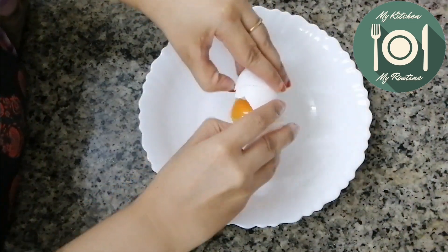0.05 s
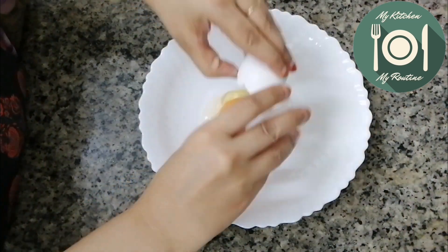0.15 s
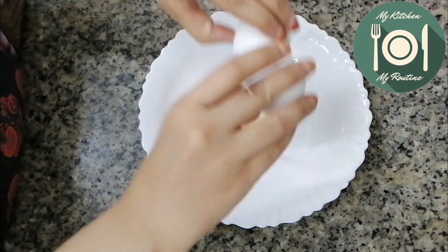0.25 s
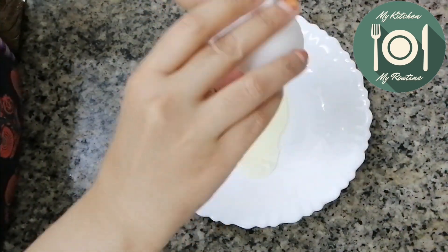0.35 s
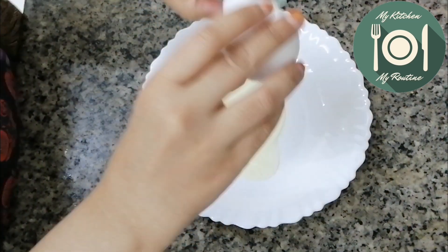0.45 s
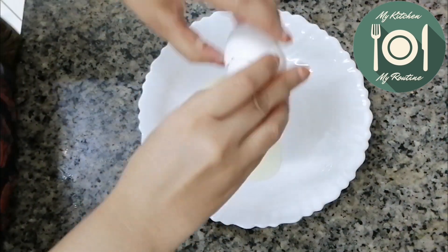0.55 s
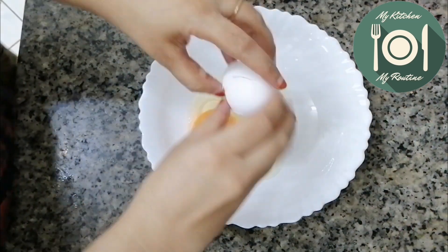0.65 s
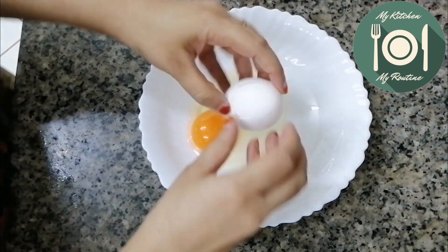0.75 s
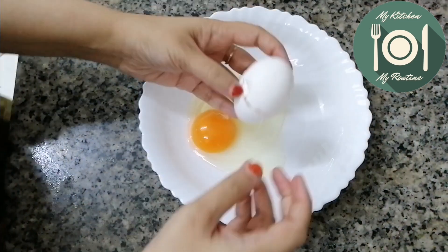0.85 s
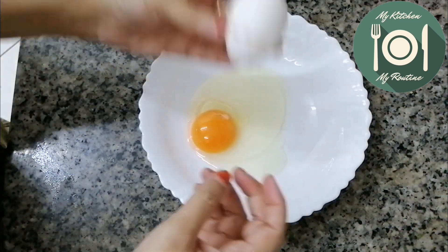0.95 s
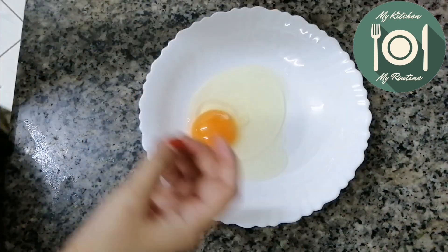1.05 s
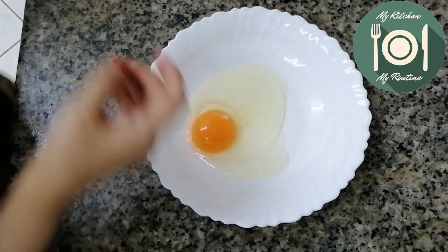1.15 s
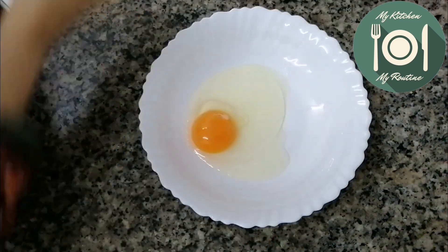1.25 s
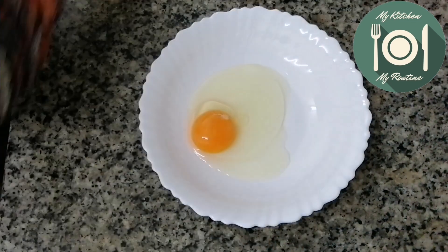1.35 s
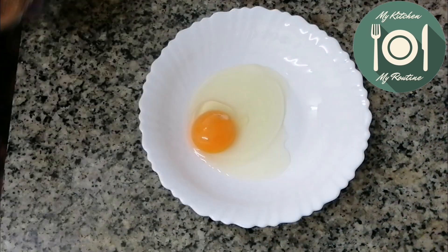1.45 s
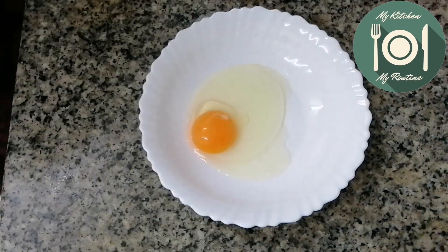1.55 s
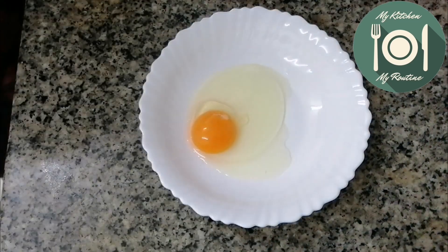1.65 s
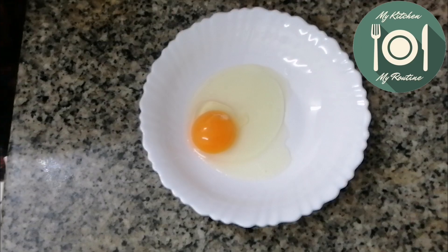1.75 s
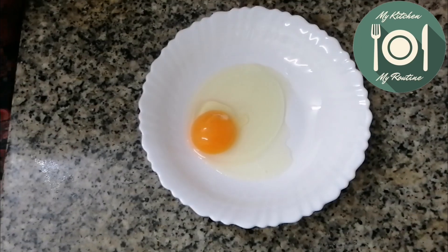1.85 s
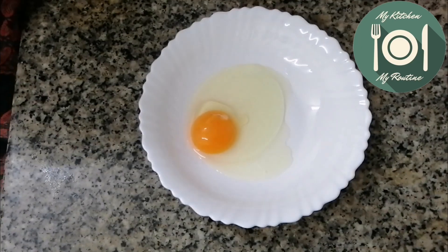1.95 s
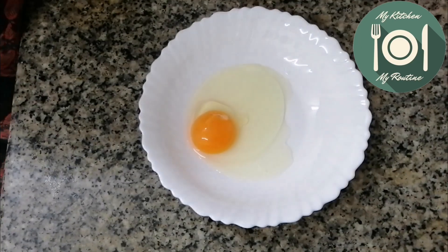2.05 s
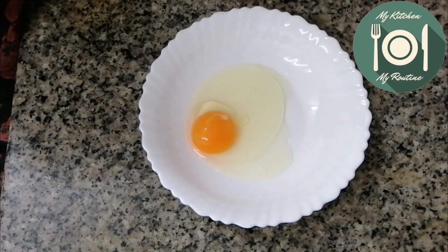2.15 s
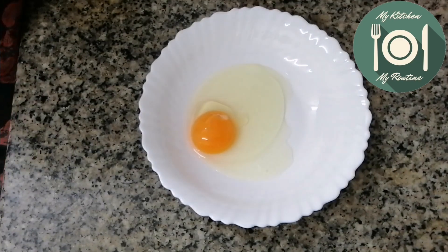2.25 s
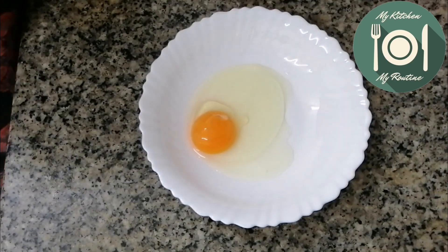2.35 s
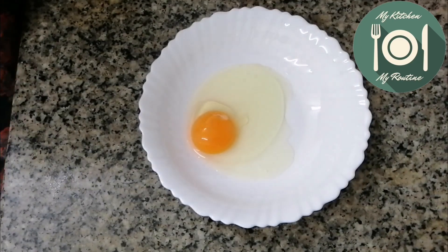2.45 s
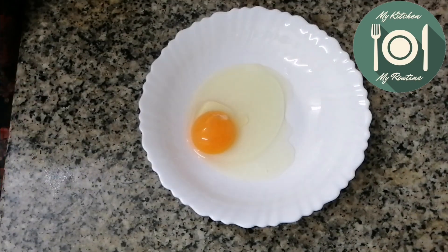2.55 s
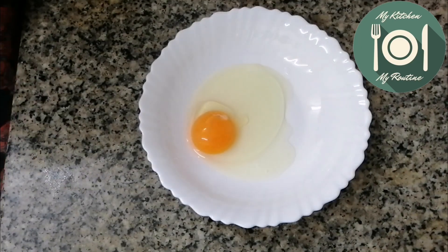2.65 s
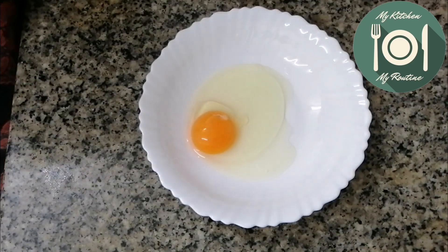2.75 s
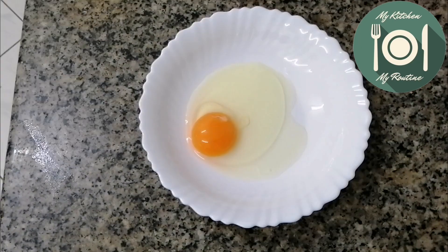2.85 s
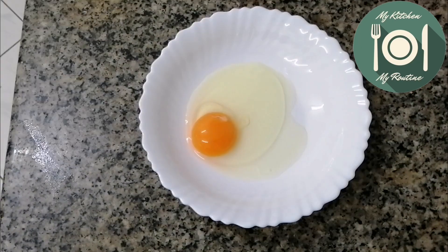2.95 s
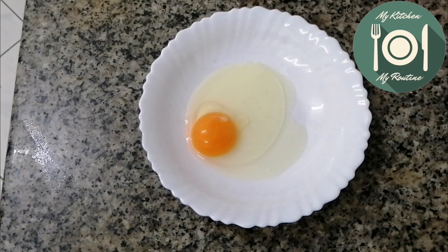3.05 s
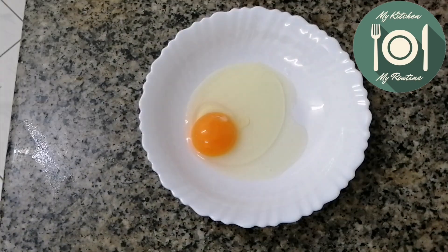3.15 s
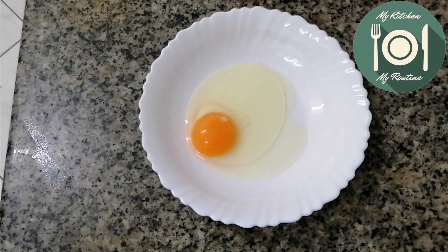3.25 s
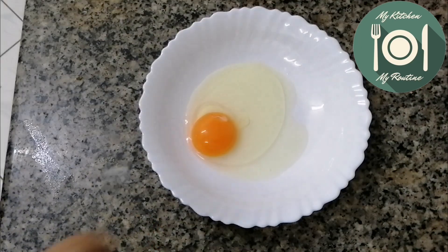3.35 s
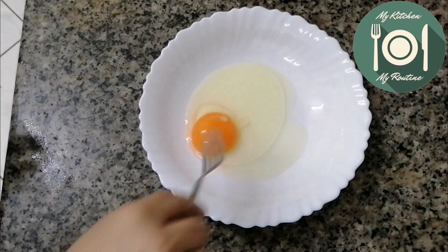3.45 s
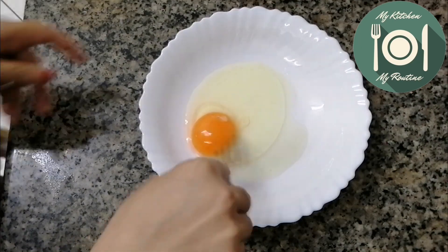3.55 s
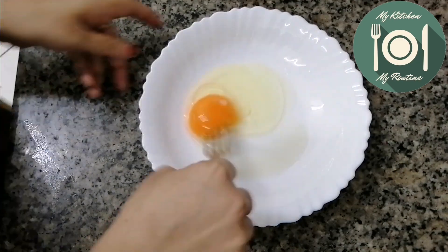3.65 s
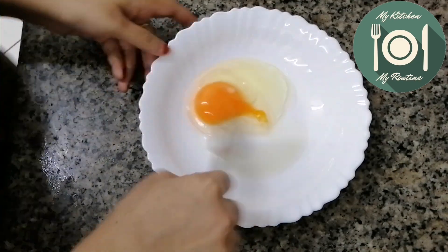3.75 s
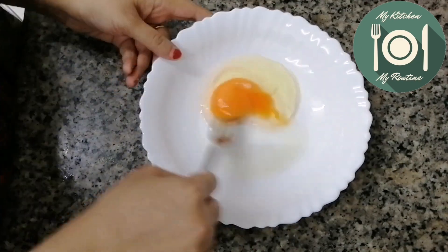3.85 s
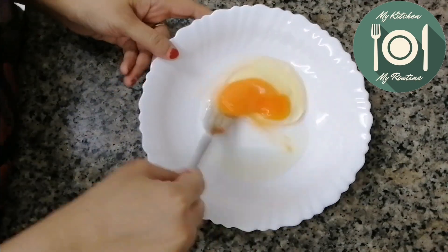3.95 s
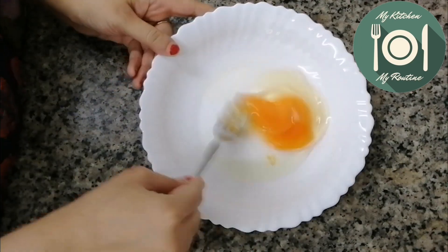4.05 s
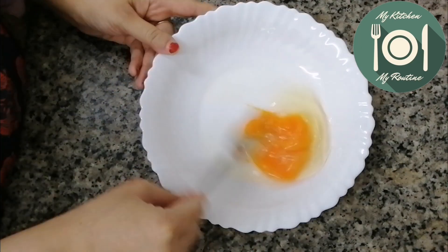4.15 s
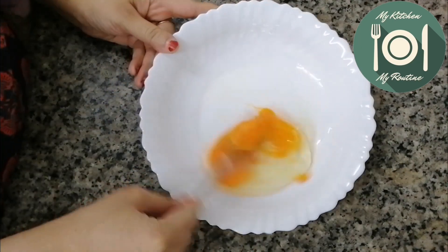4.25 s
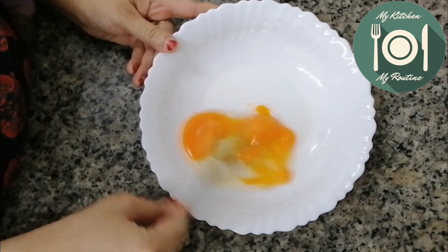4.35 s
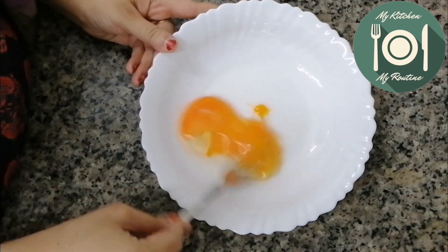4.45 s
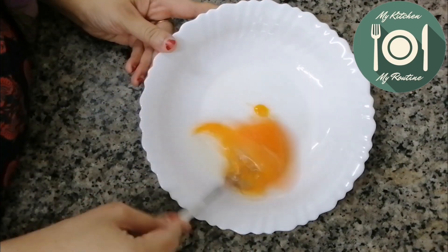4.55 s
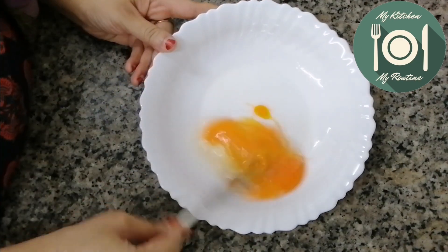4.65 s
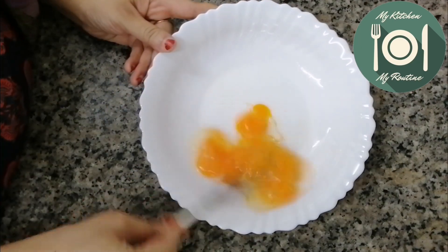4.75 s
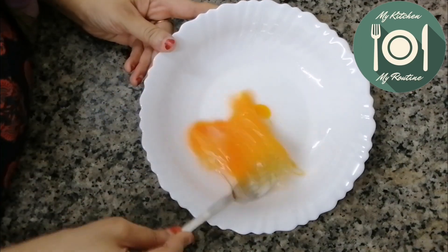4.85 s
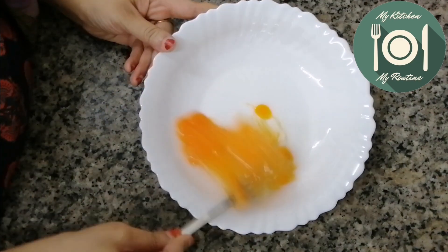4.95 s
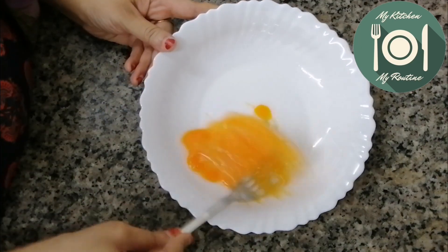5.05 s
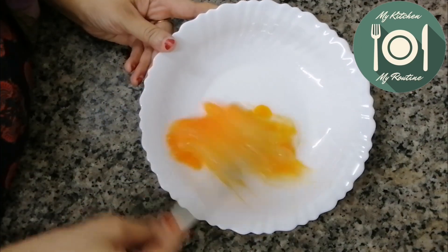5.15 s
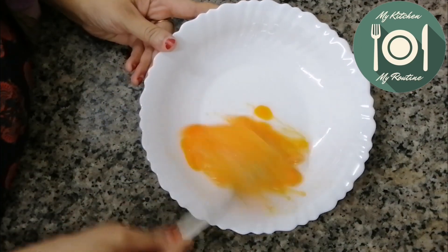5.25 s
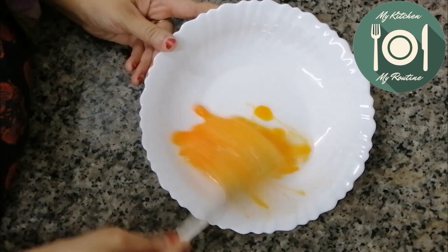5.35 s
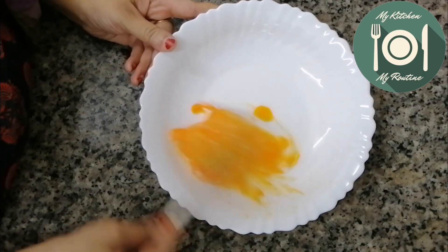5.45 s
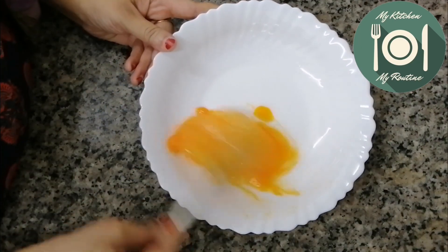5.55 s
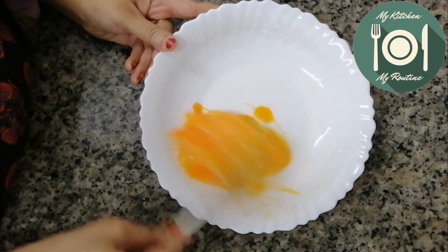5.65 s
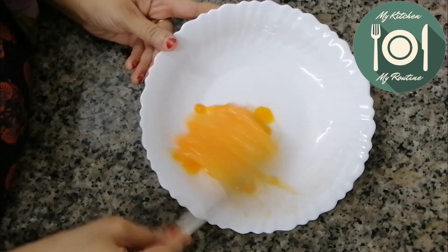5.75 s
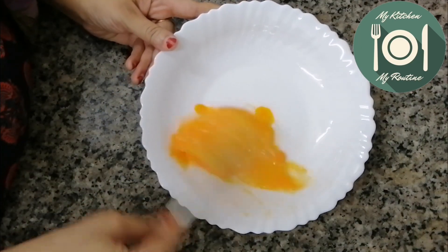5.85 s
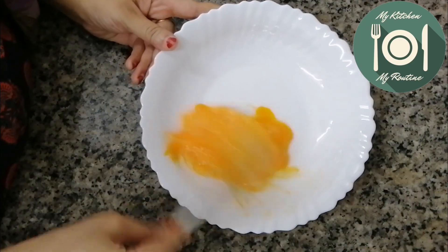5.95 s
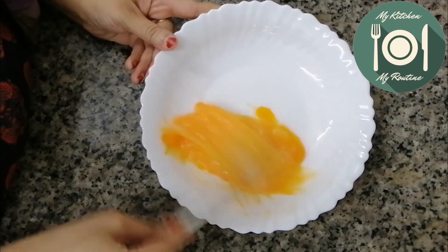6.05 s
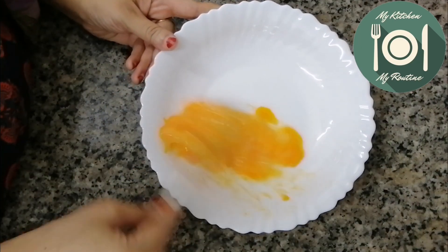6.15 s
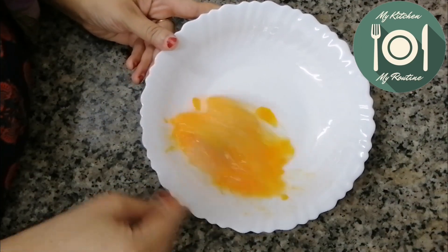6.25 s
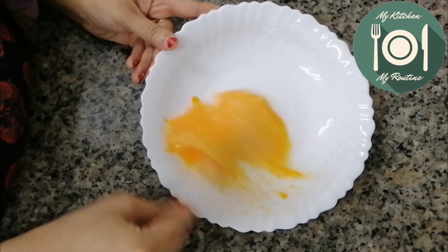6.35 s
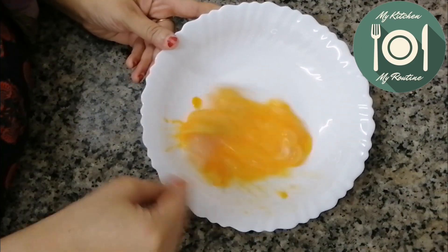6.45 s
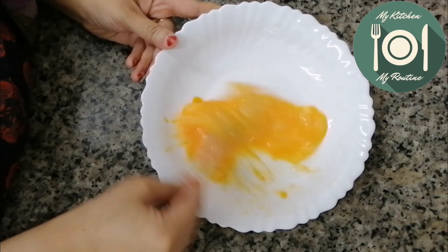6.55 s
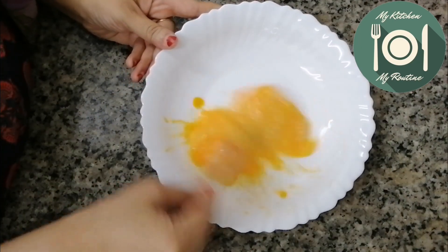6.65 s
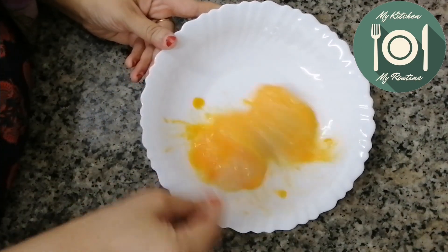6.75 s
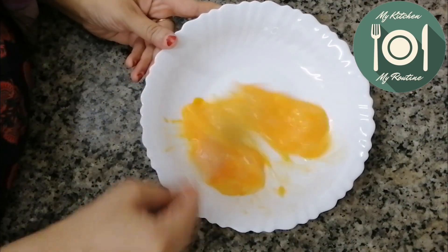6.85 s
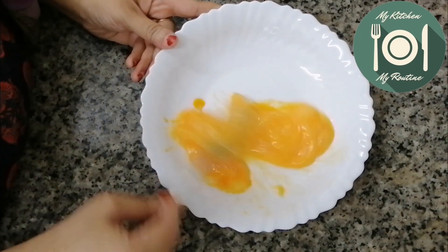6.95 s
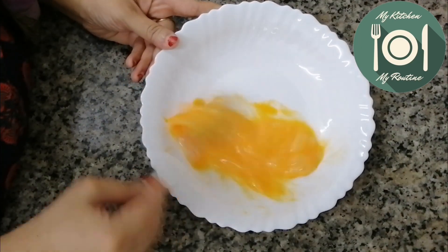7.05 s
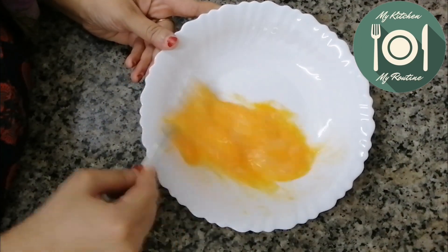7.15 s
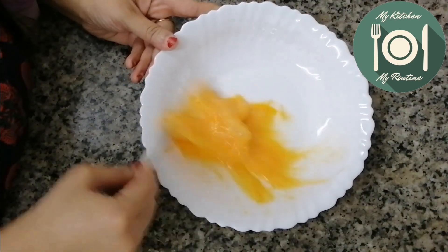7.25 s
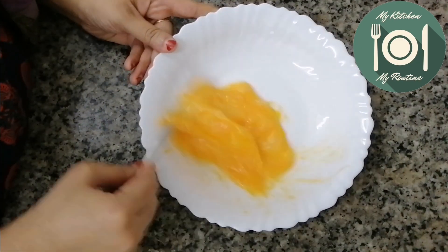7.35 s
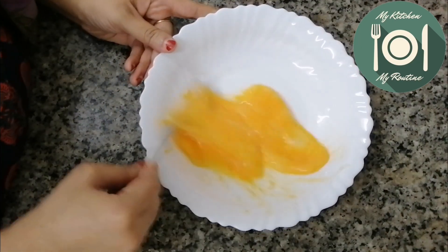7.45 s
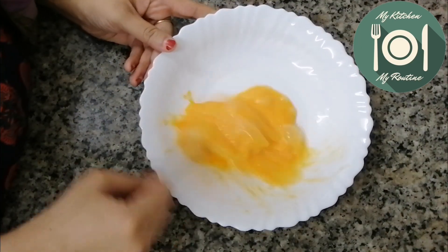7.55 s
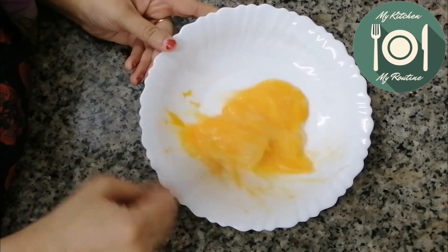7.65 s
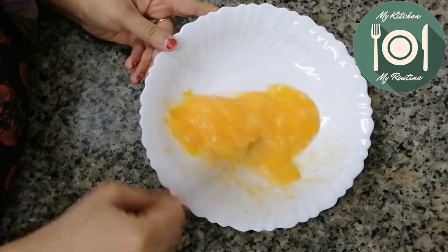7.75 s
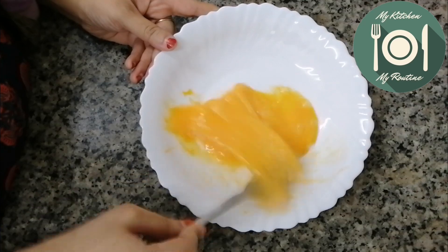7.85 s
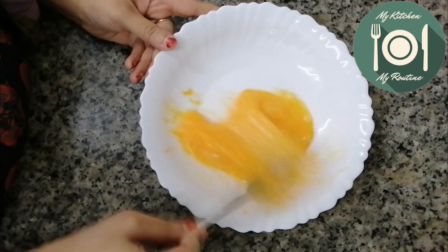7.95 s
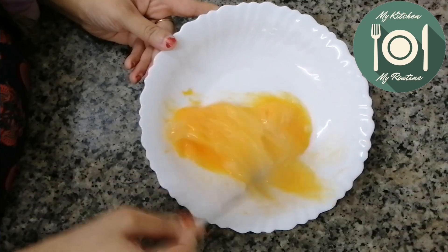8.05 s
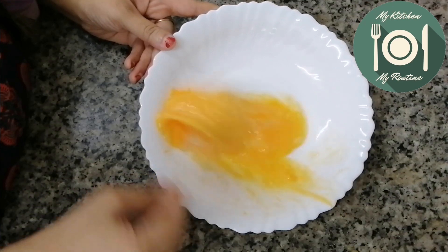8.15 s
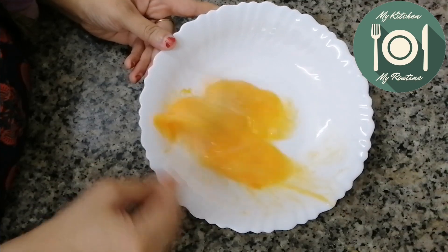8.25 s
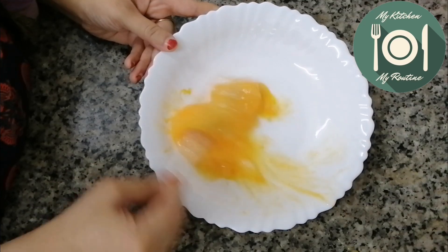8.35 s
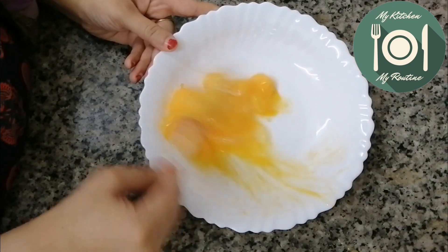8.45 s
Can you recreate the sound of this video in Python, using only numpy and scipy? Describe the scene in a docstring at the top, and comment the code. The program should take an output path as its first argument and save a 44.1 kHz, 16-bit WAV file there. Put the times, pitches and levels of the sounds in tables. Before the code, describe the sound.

Close in a small kitchen, over faint hum and hiss, crisp things snap quietly, then a plastic bag crinkles in short squeezes. Sound vanishes for an instant, and the counter takes a dull low thud with scuffs. A metal fork then beats egg on a ceramic plate about ten strokes a second, bright and clinking at first, soon wetter, with little slaps and splashes, until the end.

```python
"""A kitchen, close to a small microphone, over a low hum and hiss.
Crisp things crack as short noise puffs with a hollow note, then a plastic bag rustles as clumped noise.
The sound drops out for a moment; the counter is bumped, with a shudder of low noise, a thud and scuffs.
Then a fork beats egg on a ceramic plate ten times a second: each stroke is one or two noisy chatters
of tines that ring the resonances of the plate, with a wet slap and splash."""
import sys
import numpy as np
from scipy.fft import rfft, irfft, next_fast_len
from scipy.io import wavfile
from scipy.ndimage import uniform_filter1d, map_coordinates

SR = 44100
rng = np.random.default_rng(int(sys.argv[2]) if len(sys.argv) > 2 else 0)


def put_to_file(sound):
    """Save the sound as 16-bit audio at rate SR, in the file named by the first command-line argument."""
    columns = np.atleast_2d(sound).T  # one column per channel
    safe = np.clip(columns, -1, 1)
    whole_steps = np.round(safe * 32767)
    wavfile.write(sys.argv[1], SR, whole_steps.astype(np.int16))


N = 375291
SIZE = 8192  # samples in one burst with its echo

# Relative spectrum of crisp film, which also colours cracks and scuffs: (frequency [Hz], density [dB])
FILM_SPECTRUM = [(710, -43), (1460, -4), (1820, -1.5), (2990, 5.5), (3820, -0.5), (6540, 10.5),
                 (10700, -4.5), (15600, -6)]


def fork():
    """Tines chatter on the plate; where they land favours some modes; egg detunes, damps and splashes."""
    # touches of the fork, often two to a stroke: (time [s], level [dB], low modes re level [dB])
    strokes = [(4.127, -27.5, -7), (4.2088, -23, -8.5), (4.312, -20, -14), (4.41, -23.5, -10),
               (4.5051, -26.5, -0.5), (4.578, -54.5, 26.5), (4.6197, -24.5, -4), (4.717, -22, -11),
               (4.822, -21, -18.5), (4.9255, -23.5, -14), (5.0254, -22, -11.5), (5.131, -27, -6.5),
               (5.24, -28.5, -4), (5.344, -28.5, 2.5), (5.378, -32, -12), (5.445, -28.5, 0.5),
               (5.474, -34.5, -12), (5.5496, -26.5, -6), (5.578, -33, -29), (5.6572, -30, -12),
               (5.682, -34, -11), (5.7618, -32.5, -8), (5.784, -32, -13), (5.86, -28, -14),
               (5.884, -37.5, -8), (5.9605, -26, -4.5), (6.0586, -25, -12), (6.088, -33, -10),
               (6.1608, -24.5, -7), (6.189, -36, -5), (6.2636, -25, -8), (6.288, -36, -3.5),
               (6.3626, -26.5, -9.5), (6.3919, -32.5, -8.5), (6.465, -28, -9), (6.488, -35.5, -4),
               (6.5616, -26.5, -9), (6.5848, -28, -15), (6.67, -38.5, 3), (6.694, -34.5, -6),
               (6.7705, -29.5, -10.5), (6.7988, -29.5, -29), (6.872, -29, -10), (6.9013, -28, -13),
               (6.969, -27, -10), (7.074, -27, -14.5), (7.164, -34, 3), (7.266, -32.5, -3),
               (7.3715, -38.5, 1.5), (7.4681, -33.5, -6), (7.5011, -30.5, -28), (7.5798, -27.5, -11.5),
               (7.6083, -25.5, -15), (7.6912, -33.5, 0), (7.7167, -24, -12), (7.797, -33, 4.5),
               (7.8254, -25.5, -9.5), (7.904, -30, 6), (7.9256, -25, -24), (8.01, -32.5, 0),
               (8.0335, -26, -8.5), (8.111, -29.5, -12.5), (8.1331, -29, -8), (8.2234, -30.5, -11.5),
               (8.25, -30.5, -14), (8.3391, -33, -7), (8.3623, -32.5, -10), (8.442, -27.5, -13.5),
               (8.4747, -28.5, -31)]
    # modes of plate and fork: (nominal frequency [Hz], gain on the bare plate [dB], gain under egg [dB])
    plate_modes = [(1890, 4, -4), (1979, 23.5, -6), (2135, 12.5, 4.5), (2234, -60, 9.5), (2770, -44, -4.5),
                   (3370, -10, -18), (3786, -55.5, -15.5), (5040, -45, -6), (5895, 7.5, -3),
                   (6270, 12, -5.5), (6476, -60, 4), (7030, 25.5, -20), (7410, -33, 0.5),
                   (8540, -1.5, -8.5), (10090, -28, -10), (11730, 5, -31), (12480, 1, -24),
                   (14660, -5, -21.5)]
    # how far egg covers the plate: (time [s], share [0-1])
    coating = [(4.6, 0.46), (5.0, 0.79), (8.5, 0.95)]
    # modes favoured by where the tines land: (time [s], high mode [Hz], low mode [Hz])
    landing = [(4.12, 5930, 2170), (4.21, 6960, 2044), (4.72, 7190, 1950), (4.84, 5870, 2020),
               (5.05, 5900, 1954), (5.35, 6340, 2300), (7.74, 6410, 2240), (7.82, 7400, 2240),
               (8.05, 7380, 2240), (8.12, 6200, 2100)]
    # egg under the stroke: (time [s], slap re touch [dB], splash re touch [dB], splash hump centre [Hz])
    egg_moves = [(4.6, -61, -24, 3570), (5.3, -13, -1, 3780), (6.2, -14, -6, 2720), (7.0, -21, -10.5, 3700),
                 (7.38, -5, 6.5, 3980), (7.6, -20, -19, 2900), (8.3, -14, -0.5, 3980)]
    # the high modes rise for a few strokes: (time [s], share of pitch [1])
    sharper = [(4.6, 0), (4.8, 0.0073), (4.92, 0)]
    bare_touch_s, wet_shorter_s = 0.03, 0.006  # length of a touch; full egg cover cuts it short

    s, db, low_db = np.transpose(strokes)
    landing_s, *favoured_hz = np.transpose(landing)
    egg_s, *egg_columns = np.transpose(egg_moves)
    slap_db, splash_db, hump_hz = [np.interp(s, egg_s, column) for column in egg_columns]
    hz, bare_db, coated_db = np.transpose(plate_modes)
    coat = np.interp(s, *np.transpose(coating))[:, None]
    touch = bare_touch_s - wet_shorter_s * coat
    s = s + (bare_touch_s - touch[:, 0]) / 2  # a shorter touch peaks at about the same moment

    def stroke(echo_db, t60):
        """One puff of contact noise for each touch."""
        return bursts(len(s), touch, 0.91, echo_db, t60, grain_db=0.89, colour_db=4.65)

    def beside(centre_hz, reach):
        """Closeness of every mode to a centre on a log pitch axis, for each touch."""
        return np.exp(-(np.log(hz / centre_hz[:, None]) / reach) ** 2)

    f, chatter = stroke(-5.5, 0.37)
    _, slosh = stroke(0.91, 0.3)
    _, knock = stroke(-3 - 8 * coat ** 2, 0.35)
    _, slap_noise = stroke(-2.5, 0.34)

    # neighbouring touches land alike, so their colour drifts
    drift = uniform_filter1d(rng.standard_normal((len(s), len(hz), 2)), size=4, axis=0)
    scatter, detune = unit(drift).transpose(2, 0, 1)
    high_near, low_near = [beside(np.interp(s, landing_s, column), 0.025) for column in favoured_hz]
    near = high_near + 0.5 * low_near + 1.23 * beside(hump_hz, 0.037)
    cover_db = bare_db + coat * (coated_db - bare_db)
    strength = amp(cover_db + (14.5 - 3.6 * coat) * near + 4.25 * coat * scatter)

    # the moving load of egg shifts every mode a little and widens it
    low = hz < 4500
    rise = ~low * np.interp(s, *np.transpose(sharper))[:, None]
    pitch = hz * (1 + (0.0065 + 0.005 * coat) * detune + rise)
    width = (0.021 + 0.014 * coat) * hz + 40
    shapes = strength[..., None] * mode(f, pitch[..., None], width[..., None]) ** 2
    ring = place(s, chatter * shapes[:, ~low].sum(axis=1), db, lead=0.0115)
    body = place(s, knock * shapes[:, low].sum(axis=1), db + low_db, lead=0.013)

    # splash has a broad hump that moves with the egg; trapped air pops low
    hump, pop = rng.uniform(-0.84, 1, (len(s), 2, 1)).transpose(1, 0, 2)
    moving_hump = mode(f, hump_hz[:, None] * np.exp(0.24 * hump), 1500) ** 2
    spray = mode(f, 6500, 3600) ** 2 + 0.92 * moving_hump
    splash = place(s, slosh * spray, db + splash_db, lead=0.013)
    bubble = mode(f, 880 * np.exp(0.38 * pop), 220) * mode(f, 920, 1200) ** 2
    slap = place(s, slap_noise * bubble, db + slap_db, lead=0.008)
    return ring + body + splash + slap


def cracks():
    """Brittle breaks: a broad snap of noise with a short hollow note from one resonance."""
    # (time [s], snap level [dB], length [s], hollow note [Hz], note re snap [dB])
    breaks = [(0.028, -46, 0.036, 1450, -36), (0.333, -46, 0.03, 1500, -22),
              (0.359, -39.5, 0.04, 2650, -14), (0.454, -41.5, 0.047, 2170, -8), (0.53, -33, 0.055, 1880, 0),
              (0.569, -33.5, 0.048, 2850, -14), (0.658, -40, 0.089, 2050, -13),
              (0.717, -35, 0.041, 5640, -2.5), (1.153, -53, 0.09, 1510, 3), (3.963, -60.5, 0.023, 6840, 16),
              (4.778, -65, 0.041, 1410, 18.5)]
    s, db, length, note_hz, note_db = np.transpose(breaks)
    f, snap = bursts(len(s), length[:, None], skew=0.68, echo_db=6.0, t60=0.19, grain_db=1.5, colour_db=3.5)
    crisp = amp(along(FILM_SPECTRUM, f) + 8.3 * np.log2(1 + f / 8000))  # brighter than film
    broad = place(s, snap * crisp, db, lead=0.01)
    hollow = mode(f, note_hz[:, None], 0.17 * note_hz[:, None]) ** 2
    return broad + place(s, snap * hollow, db + note_db, lead=0.0066)


def bag():
    """Each squeeze creases the film in clumps of tiny snaps; its folds rub more dully."""
    # the bag is squeezed: (time [s], peak level [dB], dull rub re squeeze [dB])
    squeezes = [(1.919, -54.5, -10), (1.994, -48, -3.5), (2.578, -62, -10), (2.649, -48.5, -13),
                (2.74, -51.5, -8), (2.868, -53.5, -2.5), (2.965, -34, -12), (3.042, -41.5, -27),
                (3.15, -37.5, -20.5), (3.252, -43.5, -15)]
    # the bag shifts in the hand: (time [s], level [dB])
    shifts = [(2.25, -88), (2.33, -55), (2.88, -47.5), (2.93, -72.5), (3.26, -50.5)]
    rise_db_per_s, fall_db_per_s = 656, 257  # a squeeze swells fast and eases off

    s, db, dull_db = np.transpose(squeezes)[..., None]
    late = np.arange(N) / SR - s
    squeeze = amp(db - np.where(late < 0, -rise_db_per_s * late, fall_db_per_s * late))
    held, = gains(shifts)
    clumps = amp(1.3 * wobble(60) + 1.8 * wobble(500))
    film = filtered(clumps * rng.standard_normal(N), lambda f: amp(along(FILM_SPECTRUM, f)))
    slide = filtered(film, lambda f: 1 / (1 + (f / 9500) ** 4))  # an easy shift is darker than a squeeze
    dull = filtered(rng.standard_normal(N), lambda f: mode(f, 920, 760) ** 2)
    rub_gain = (squeeze * amp(dull_db)).sum(axis=0) + amp(-17) * held
    return squeeze.sum(axis=0) * unit(film) + held * unit(slide) + rub_gain * unit(dull)


def counter():
    """Hand and plate drag over stone as noise; a bump shudders through the stand with one low thud."""
    # scuffs: (time [s], level [dB], length [s], centre [Hz])
    drags = [(3.322, -45, 0.13, 1550), (3.757, -38, 0.16, 930), (4.167, -33.5, 0.083, 322)]
    # the counter shudders: (time [s], level [dB])
    bump = [(3.33, -40), (3.36, -33), (3.4, -37), (3.5, -57)]
    # one thud: (time [s], level [dB], frequency [Hz])
    low_thud = (3.3872, -16.5, 125)

    s, db, length, hz = np.transpose(drags)
    f, rub = bursts(len(s), length[:, None], skew=0.48, echo_db=-24, t60=0.16, grain_db=0.5, colour_db=0.5)
    centre = hz[:, None]
    dark = mode(f, centre, 1.2 * centre) / (1 + (f / 3000) ** 6)
    crisp = centre / 9000 * amp(along(FILM_SPECTRUM, f))
    scuffs = place(s, rub * (dark + crisp), db, lead=0)

    def stand(f):
        """Two low resonances of the stand."""
        return mode(f, 115, 61) * mode(f, 115, 450) + 0.047 * mode(f, 310, 300) ** 2

    shudder = filtered(rng.standard_normal(N), stand)
    s, db, hz = low_thud
    cycles = (np.arange(N) / SR - s) * hz
    thud = -amp(db) * np.sin(2 * np.pi * cycles) * np.exp(-(cycles / 0.45) ** 2)
    return scuffs + gains(bump)[0] * unit(shudder) + thud


def room():
    """Noise shaped into rumble with a wavering mains hum, and hiss with a narrow peak high up."""
    # relative spectrum of room and microphone noise: (frequency [Hz], density [dB])
    noise_spectrum = [(35, 2), (133, 1.5), (400, -10.5), (3100, -26), (3980, -32), (6760, -22.5),
                      (11500, -45), (14300, -36.5), (15600, -40)]
    # (time [s], level [dB])
    noise_level = [(0, -54.5), (4.25, -52), (4.6, -58.5), (5.8, -64.5), (8.51, -63.5)]

    def colour(f):
        """Broad noise with a hum peak and a hiss peak."""
        peaks = 2.24 * mode(f, 52.4, 3.9) + 1.4 * mode(f, 10300, 500)
        return amp(along(noise_spectrum, f)) * (1 + peaks)

    return gains(noise_level)[0] * unit(filtered(rng.standard_normal(N), colour))


def bursts(count, length, skew, echo_db, t60, grain_db, colour_db):
    """Spectra of grainy noise puffs, one a row, each with its own decaying echo from the walls."""
    t = np.arange(SIZE) / SR
    progress = np.clip(t / length, 0, 1)
    shape = np.sin(np.pi * progress ** skew) ** 2  # a skew below 1 peaks early
    f = np.fft.rfftfreq(SIZE, 1 / SR)
    direct, reflected, rough = rng.standard_normal((count, 3, SIZE)).transpose(1, 0, 2)
    grain = amp(grain_db * unit(uniform_filter1d(rough, size=90)))
    fade_out = np.cos(np.pi / 2 * t / t[-1])
    echo = amp(echo_db - 60 * t / t60) * progress ** 2 * fade_out
    # every contact excites its own chance set of small resonances
    colour = amp(colour_db * unit(uniform_filter1d(rng.standard_normal((count, len(f))), size=50)))
    puff = rfft(direct * grain * shape)
    tail = rfft(reflected * grain * echo) / (1 + (f / 11000) ** 2)  # the echo is darker
    return f, colour * (puff + tail)


def place(times, spectra, db, lead):
    """Lays each row on the time line, lead seconds ahead of its time, at a set nominal peak level."""
    rows, out = irfft(spectra, SIZE), np.zeros(N + SIZE)
    loudest = uniform_filter1d(rows ** 2, size=400, axis=1).max(axis=1)
    peak = 3 * np.sqrt(loudest)  # noise peaks at about thrice its rms
    for s, row, gain in zip(times, rows, amp(db) / peak):
        start = max(round((s - lead) * SR), 0)
        out[start:][:SIZE] += gain * row
    return out[:N]


def mode(f, hz, width):
    """A causal resonance with gain 1 at its centre; width in Hz."""
    return 1j * f * width / (hz * hz - f * f + 1j * f * width)


def filtered(x, response):
    """x filtered by a response that is a function of frequency in Hz."""
    m = next_fast_len(N + SIZE)
    return irfft(rfft(x, m) * response(np.fft.rfftfreq(m, 1 / SR)), m)[..., :N]


def wobble(rate):
    """A smooth random curve with rate knots a second."""
    return map_coordinates(rng.standard_normal(int(N * rate / SR) + 4), [np.arange(N) * rate / SR])


def gains(rows):
    """One gain curve for each dB column after the time column, all but silent outside the rows."""
    s, *columns = np.transpose(rows)
    return [amp(np.interp(np.arange(N) / SR, s, column, -150, -150)) for column in columns]


def along(points, hz):
    """Interpolates (Hz, value) points on a log frequency axis."""
    f, v = np.transpose(points)
    return np.interp(np.log(hz + 1), np.log(f + 1), v)


def amp(db):
    """dB to gain."""
    return 10 ** (np.asarray(db) / 20)


def unit(x):
    """Scales x to rms 1."""
    return x / np.sqrt(np.mean(x ** 2) + 1e-20)


def scene():
    """All sources summed at one microphone."""
    return (fork() + cracks() + bag() + counter() + room())[None]


def record(dry):
    """The sound is silent for a moment, and nothing is kept above the band limit."""
    # the silent moment: (start [s], end [s])
    dropout = (3.264, 3.331)
    top_hz, fade_s = 15740, 0.006
    start, end = dropout
    t = np.arange(N) / SR
    on = np.clip(np.maximum(start - t, t - end) / fade_s, 0, 1)
    return filtered(dry * on, lambda f: f < top_hz)


dry = scene()
out = record(dry)
put_to_file(out)
```